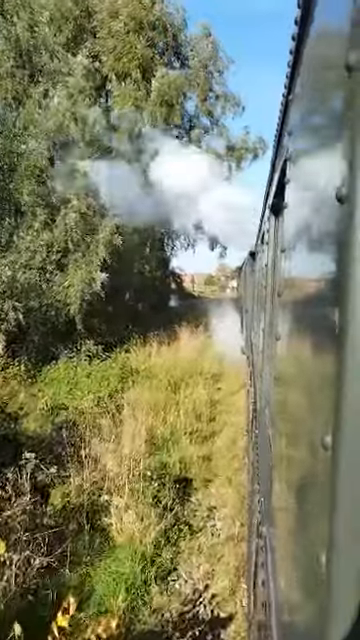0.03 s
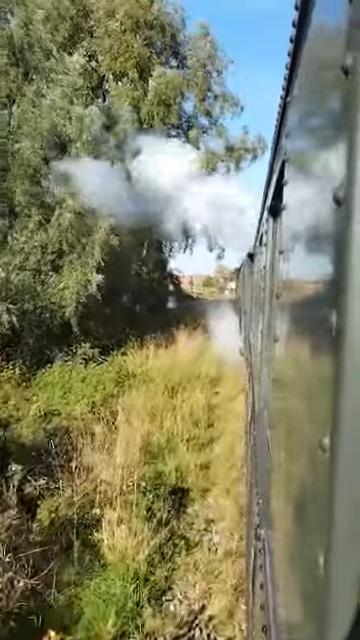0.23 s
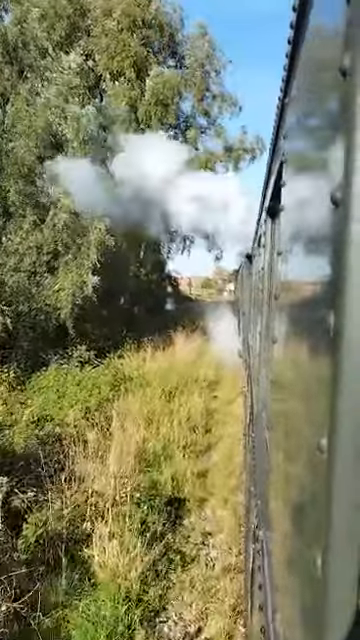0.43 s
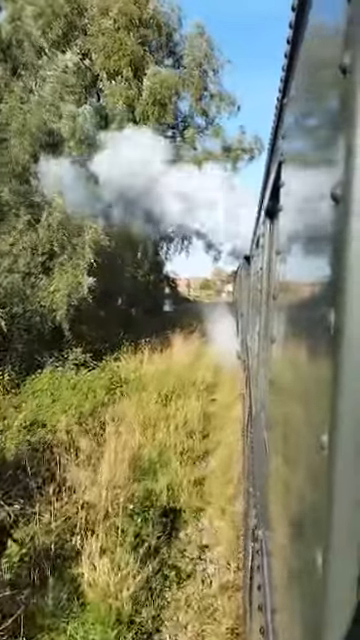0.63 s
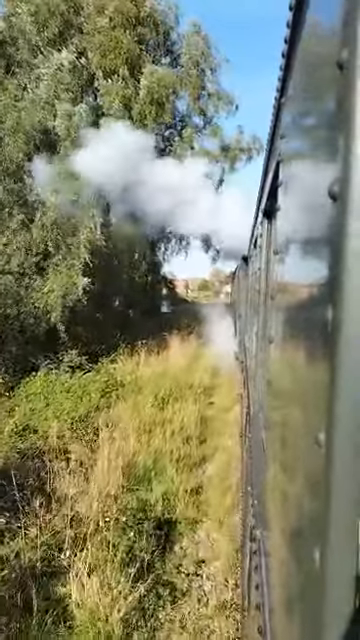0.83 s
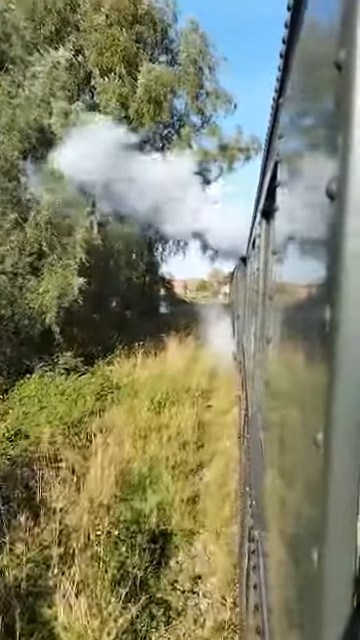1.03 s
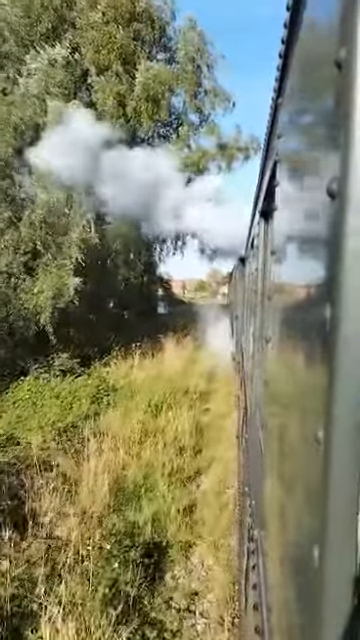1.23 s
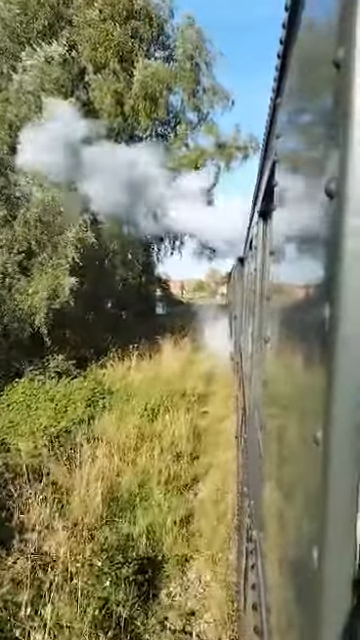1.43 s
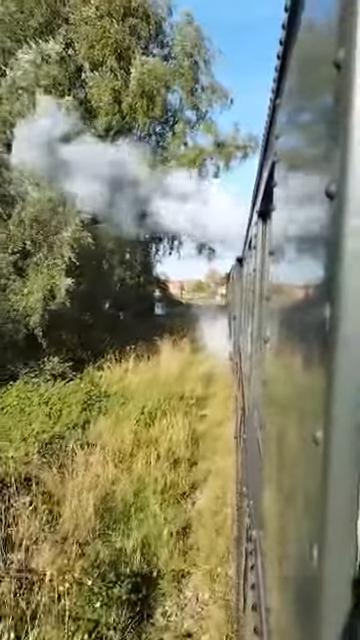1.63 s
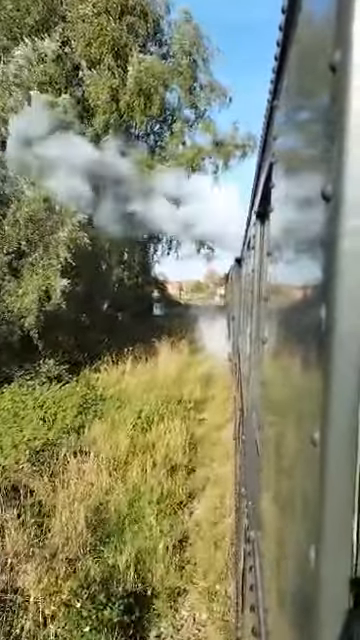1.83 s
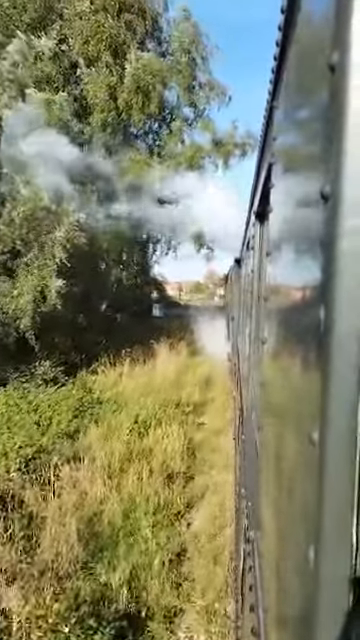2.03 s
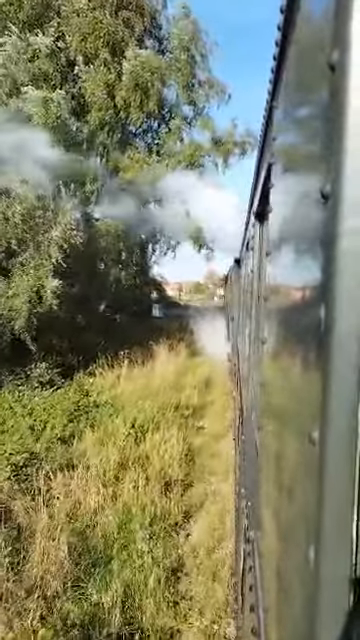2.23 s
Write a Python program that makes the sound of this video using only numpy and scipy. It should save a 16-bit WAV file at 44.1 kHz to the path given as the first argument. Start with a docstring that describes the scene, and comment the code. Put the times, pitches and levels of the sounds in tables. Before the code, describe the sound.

A steam locomotive whistle dominates: after brief running noise it scoops up at 0.2 seconds, holds a clear, fluttering note near 1170 hertz with short dips, climbs harsher around 1.1, then sags and shuts off at 1.33 with a steam puff and dull knock. Echoes scatter from trees and fade. Rumble, roar and wide airy hiss continue to 2.3, with wind buffeting around 0.45-0.75 and hollow booms near 2.0.

```python
"""Steam whistle from a carriage window

A locomotive's whistle scoops up to a steady note, is pulled higher and harsher, and sags as the valve shuts.
It is a sum of six fluttering sine partials plus steam noise; lineside trees scatter it back.
Underneath, the train rumbles, roars and hisses as shaped noise with sine booms and one knock.
Short bands of noise make a gust buffet the microphone. Only the hiss is stereo."""
import sys
import numpy as np
from scipy import signal
from scipy.fft import rfft, irfft, next_fast_len
from scipy.io import wavfile
from scipy.ndimage import uniform_filter1d, map_coordinates

SR = 44100
rng = np.random.default_rng(int(sys.argv[2]) if len(sys.argv) > 2 else 0)


def dump(signal):
    """Clip the signal to [-1, 1] and save it as 16-bit WAV at the path in sys.argv[1]."""
    limited = np.clip(np.atleast_2d(signal).T, -1, 1)
    pcm = np.round(limited * 32767).astype(np.int16)
    wavfile.write(sys.argv[1], SR, pcm)


N = 101429


def amp(db):
    """Decibels to gain."""
    return 10 ** (np.asarray(db) / 20)


def unit(x):
    """Scale to rms 1."""
    return x / np.sqrt(np.mean(x ** 2) + 1e-20)


def along(points, hz):
    """Interpolate (Hz, value) points on a log frequency axis."""
    f, v = np.transpose(points)
    return np.interp(np.log(hz + 1), np.log(f + 1), v)


def curve(rows, outside=None):
    """Interpolate (s, value) points to one value per sample."""
    s, v = np.transpose(rows)
    return np.interp(np.arange(N) / SR, s, v, outside, outside)


def wobble(rate):
    """Smooth random curve with rate knots per second."""
    knots = rng.standard_normal(4096)
    return map_coordinates(knots, [np.arange(N) * rate / SR], mode="wrap")


def bell(centre_s, width_s):
    """Gaussian envelope with peak 1; width is the standard deviation."""
    t = np.arange(N) / SR
    return np.exp(-.5 * ((t - centre_s) / width_s) ** 2)


def filtered(x, response):
    """Multiply the spectrum of x by a function of frequency."""
    m = next_fast_len(N + SR // 2)
    return irfft(rfft(x, m) * response(np.fft.rfftfreq(m, 1 / SR)), m)[..., :N]


def coloured(x, colour):
    """Filter x by a (Hz, dB) curve."""
    return filtered(x, lambda hz: amp(along(colour, hz)))


def noise(colour):
    """Coloured noise of rms 1."""
    return unit(coloured(rng.standard_normal(N), colour))


# Whistle pitch. Each row: time in seconds, pitch in Hz.
PITCH_HZ = [(.19, 900), (.22, 1050), (.25, 1125), (.3, 1160), (.45, 1168), (.72, 1170), (1.0, 1179),
            (1.05, 1199), (1.085, 1234), (1.12, 1332), (1.16, 1372), (1.22, 1370), (1.255, 1325),
            (1.285, 1279), (1.31, 1150), (1.33, 1060)]
# Fundamental level. Each row: time in seconds, level in dB.
FUNDAMENTAL_DB = [(.18, -50.5), (.215, -26.5), (.255, -16), (.3, -14), (.35, -18.5), (.4, -11), (.49, -9),
                  (.65, -5.5), (.78, -15.5), (.9, -8), (.99, -9), (1.045, -14), (1.125, -11), (1.185, -8.5),
                  (1.22, -27.5), (1.255, -8.5), (1.305, -11), (1.335, -33.5)]
# Second partial level. Each row: time in seconds, level in dB.
SECOND_DB = [(.22, -62), (.32, -36.5), (.41, -32), (.46, -34), (.52, -35), (.62, -55), (.67, -36),
             (.71, -35), (.8, -35.5), (.86, -36), (.94, -42), (.99, -30), (1.07, -46), (1.2, -34),
             (1.28, -33.5), (1.335, -60)]
# Third partial level, which the higher ones follow. Each row: time in seconds, level in dB.
THIRD_DB = [(.24, -53.5), (.36, -31), (.47, -49), (.52, -33.5), (.58, -44), (.71, -32.5), (.765, -42.5),
            (.8, -28), (.87, -48), (.95, -31), (1.02, -39), (1.08, -30), (1.16, -46.5), (1.21, -28),
            (1.27, -23.5), (1.315, -36.5)]
# Partials four to six over the third. Each row: level in dB at STEADY_HZ, level in dB at HARD_HZ.
OVERTONES_DB = [(-15.5, -7.5), (-18.5, -41), (-26, -32)]
# Steam jet noise, strongest as the valve shuts. Each row: time in seconds, level in dB.
STEAM_DB = [(.19, -73), (.3, -48), (1.1, -39), (1.2, -39.5), (1.28, -33.5), (1.335, -36.5), (1.4, -60),
            (1.45, -80)]
# Steam spectrum. Each row: frequency in Hz, relative level in dB.
STEAM_COLOUR = [(200, -41), (600, 1), (1000, -5.5), (1600, 1), (2200, -8), (4500, -4.5), (6500, -11.5),
                (9000, -22), (13000, -18.5)]
STEADY_HZ, HARD_HZ = 1159.7, 1410
JITTER_SHARE, JITTER_KNOTS_PER_S = 0.0021, 140
FADE_DB, FADE_KNOTS_PER_S = 1.56, 30  # overtone levels
ROUGH, ROUGH_KNOTS_PER_S = 0.28, 220  # overtone flutter: share of level, also radians of phase
BREATH_DB, BREATH_HALF_WIDTH_HZ = -29, 263.4  # turbulence around the note; dB over the fundamental
MERGE_HZ = 51  # closer to the steady note, reflections fade out instead of beating
NEAR_DB = -0.5


def whistle():
    """One pipe tone with fluttering pitch; on the glides it beats against its own near reflections."""
    pitch_hz = curve(PITCH_HZ)
    fluttering_hz = pitch_hz * (1 + JITTER_SHARE * wobble(JITTER_KNOTS_PER_S))
    phase = 2 * np.pi * np.cumsum(fluttering_hz) / SR
    hardness = np.clip((pitch_hz - STEADY_HZ) / (HARD_HZ - STEADY_HZ), 0, 1)

    breath_knots = 2 * BREATH_HALF_WIDTH_HZ
    breath = unit(wobble(breath_knots) * np.sin(phase) + wobble(breath_knots) * np.cos(phase))
    fundamental = unit(np.sin(phase)) + amp(BREATH_DB) * breath
    tone = amp(curve(FUNDAMENTAL_DB, -np.inf)) * fundamental

    third_db = curve(THIRD_DB, -np.inf)
    levels_db = [curve(SECOND_DB, -np.inf), third_db]
    for soft_db, hard_db in OVERTONES_DB:
        levels_db.append(third_db + soft_db + hardness * (hard_db - soft_db))
    for partial, db in enumerate(levels_db, start=2):
        flutter = 1 + ROUGH * wobble(ROUGH_KNOTS_PER_S)
        gain = amp(db + FADE_DB * wobble(FADE_KNOTS_PER_S))
        rough_phase = partial * phase + ROUGH * wobble(ROUGH_KNOTS_PER_S)
        tone += gain * unit(flutter * np.sin(rough_phase))

    gliding = np.clip(np.abs(pitch_hz - STEADY_HZ) / MERGE_HZ, 0, 1)
    reflected = amp(NEAR_DB) * near_reflections(tone * gliding)
    steam = amp(curve(STEAM_DB, -np.inf)) * noise(STEAM_COLOUR)
    return tone + reflected + steam


NEAR_T60_S, NEAR_GAP_S = 0.19, 0.0082


def near_reflections(x):
    """Carriage sides and bank: convolution with a short, dense, decaying noise cluster."""
    t = np.arange(SR // 4) / SR
    cluster = rng.standard_normal(len(t)) * amp(-60 * t / NEAR_T60_S) * (t > NEAR_GAP_S)
    return signal.fftconvolve(x, cluster / np.linalg.norm(cluster))[:N]


CHIFF_S, CHIFF_WIDTH_S, CHIFF_HZ, CHIFF_DB = 0.188, 0.017, 1336, -48.5


def chiff():
    """First steam over the lip: a brief faint sine squeak just before the pipe speaks."""
    t = np.arange(N) / SR
    return amp(CHIFF_DB) * bell(CHIFF_S, CHIFF_WIDTH_S) * unit(np.sin(2 * np.pi * CHIFF_HZ * t))


# Tree scatter decay. Each row: frequency in Hz, t60 in seconds.
TREES_T60_S = [(1200, 2.17), (2600, 1.2), (4000, .95), (5500, .7), (10000, .4)]
# Tree scatter spectrum. Each row: frequency in Hz, gain in dB.
TREES_COLOUR = [(1200, -9), (2350, -8), (2700, -3), (3500, -3), (4000, 0), (5400, -5.5), (9000, -8)]
# Distinct lineside echoes. Each row: delay in seconds, level in dB before the echo spectrum.
ECHOES = [(.11, -24), (0.184, -19), (.24, -27), (.5, -20)]
# Echo spectrum. Each row: frequency in Hz, gain in dB.
ECHO_COLOUR = [(1400, -1), (2600, 7.5), (4000, 12.5), (5500, 7), (8000, -15)]
ECHO_DULL_DB_PER_S_KHZ = 15  # treble loss above HARD_HZ, growing with delay
ECHO_LATE_S, SCATTER_TURN_HZ = 0.00102, 1.579


def trees(x):
    """Diffuse scatter, ever changing as the train moves between two noise tails, plus distinct echoes."""
    hz, t, z = signal.stft(rng.standard_normal((2, 2 * SR)), SR, nperseg=256)
    t60 = along(TREES_T60_S, hz)[:, None]
    unit_energy = np.sqrt(2 * np.log(1000) / (t60 * SR))
    tails = signal.istft(z * amp(-60 * t / t60) * unit_energy, SR, nperseg=256)[1]
    a, b = signal.fftconvolve(x[None], tails, axes=1)[:, :N]
    turn = 2 * np.pi * SCATTER_TURN_HZ * np.arange(N) / SR
    scatter = coloured(a * np.cos(turn) + b * np.sin(turn), TREES_COLOUR)

    echoes = np.zeros(N)
    for delay_s, db in ECHOES:
        delay = int(SR * (delay_s + abs(rng.normal(0, ECHO_LATE_S))))
        late = np.pad(x, (delay, 0))[:N]
        dull_db_per_khz = ECHO_DULL_DB_PER_S_KHZ * delay_s
        echoes += filtered(late, lambda f: amp(db - dull_db_per_khz * np.maximum(f - HARD_HZ, 0) / 1000))
    return scatter + coloured(echoes, ECHO_COLOUR)


# Dips of the note. Each row: centre in seconds, half width in seconds, depth in dB.
FADES = [(0.54, 0.015, -12.5), (0.719, 0.015, -8), (0.944, 0.016, -12.5)]
# Band that dips. Each row: frequency in Hz, share that fades from 0 to 1.
FADE_BAND = [(950, 0), (1100, 1), (1250, 1), (1500, 0)]


def fading(x):
    """The held note dips briefly where its paths cancel as the train moves: Gaussian dips in one band."""
    db = sum(depth_db * bell(s, width_s) for s, width_s, depth_db in FADES)
    return x + (amp(db) - 1) * filtered(x, lambda hz: along(FADE_BAND, hz))


# Bass of the running noise. Each row: time in seconds, level in dB.
RUMBLE_DB = [(0, -47), (.08, -33), (.18, -41), (.26, -36), (.45, -36), (.7, -35), (.87, -42), (1.1, -38.5),
             (1.4, -39), (1.6, -38.5), (1.9, -44), (2.02, -34), (2.3, -42)]
# Rumble spectrum. Each row: frequency in Hz, relative level in dB.
RUMBLE_COLOUR = [(15, -20), (30, -16.5), (44, 0.5), (58, -5), (100, -11), (160, -18.5), (400, -73)]
# Low middle of the running noise. Each row: time in seconds, level in dB before flutter.
ROAR_DB = [(0, -45.5), (.05, -48.5), (.11, -35.5), (.22, -42), (.37, -43), (.75, -39), (.95, -49.5),
           (1.06, -40), (1.18, -46), (1.29, -44.5), (1.44, -48), (1.56, -36.5), (1.7, -46.5), (1.9, -46),
           (2.02, -36.5), (2.3, -46.5)]
# Roar spectrum. Each row: frequency in Hz, relative level in dB.
ROAR_COLOUR = [(60, -20), (130, 1), (240, 2.5), (340, -4), (560, -5.5), (800, -11.5), (1500, -17),
               (2500, -20.5), (6000, -44.5)]
# Running gear booms and moans. Each row: centre in seconds, half length in seconds,
# pitch in Hz before wander, peak level in dB.
BOOMS = [(0.382, 0.016, 236.7, -34), (0.418, 0.044, 880, -41.5), (1.072, 0.026, 239.5, -37.5),
         (1.562, 0.055, 593, -44), (1.964, 0.075, 547.7, -45.5), (2, 0.016, 233.7, -28),
         (2.05, 0.041, 238.6, -39), (2.121, 0.019, 192.5, -31), (2.242, 0.055, 177.7, -43)]
ROAR_FLUTTER_DB, ROAR_KNOTS_PER_S = 1.3, 25.48
BOOM_WANDER_HZ, BOOM_KNOTS_PER_S = 15, 90
KNOCK_S, KNOCK_WIDTH_S, KNOCK_HZ, KNOCK_DB = 1.334, 0.0054, 87, -23.5


def train():
    """Noise rumble and roar, hollow booms as wandering sines, one dull carriage knock as a sine burst."""
    t = np.arange(N) / SR
    out = amp(curve(RUMBLE_DB)) * noise(RUMBLE_COLOUR)
    roar_db = curve(ROAR_DB) + ROAR_FLUTTER_DB * wobble(ROAR_KNOTS_PER_S)
    out += amp(roar_db) * noise(ROAR_COLOUR)
    for s, width_s, hz, db in BOOMS:
        phase = 2 * np.pi * np.cumsum(hz + BOOM_WANDER_HZ * wobble(BOOM_KNOTS_PER_S)) / SR
        out += amp(db) * bell(s, width_s) * unit(np.sin(phase))
    knock = unit(np.sin(2 * np.pi * KNOCK_HZ * (t - KNOCK_S)))
    return out + amp(KNOCK_DB) * bell(KNOCK_S, KNOCK_WIDTH_S) * knock


# Microphone gusts. Each row: start in seconds, length before release in seconds, level in dB, centre in Hz.
GUSTS = [(0.446, 0.02, -31, 930), (.443, 0.029, -28, 360), (.5, 0.13, -31, 264), (.499, 0.032, -30, 1280),
         (.56, 0.026, -31, 1330), (.612, .02, -32, 2100), (.5, 0.14, -25.5, 47), (0.549, 0.038, -24, 51),
         (.498, 0.086, -28.5, 114), (0.68, 0.056, -28.5, 39)]
GUST_ATTACK_S, GUST_RELEASE_S, GUST_Q = .003, 0.015, 1.78
GUST_LUMP_DB, GUST_KNOTS_PER_S, GUST_TOP_HZ = 1.5, 69.53, 3500


def wind():
    """Short lumpy gusts on the microphone: resonant bands of noise, softened in the treble."""
    t, out = np.arange(N) / SR, np.zeros(N)
    for s, length_s, db, hz in GUSTS:
        attack = np.clip((t - s) / GUST_ATTACK_S, 0, 1)
        release = np.exp(-np.maximum(t - s - length_s, 0) / GUST_RELEASE_S)

        def response(f):
            """Band-pass at hz times a gentle low-pass."""
            band = 1j * f * hz / (hz * hz - f * f + 1j * f * hz / GUST_Q)
            return band / (1 + (f / GUST_TOP_HZ) ** 2)

        puff = filtered(rng.standard_normal(N), response)
        lumps = amp(GUST_LUMP_DB * wobble(GUST_KNOTS_PER_S))
        out += amp(db) * attack * release * unit(puff * lumps)
    return out


# Hiss level. Each row: time in seconds, mid level in dB before flutter.
HISS_DB = [(0, -38), (.04, -38), (.12, -44), (.15, -41.5), (.18, -38.5), (.27, -34.5), (.45, -36.5),
           (.72, -36), (.85, -35.5), (1.1, -40.5), (1.2, -34.5), (1.28, -34), (1.38, -36), (1.55, -34.5),
           (1.93, -36.5), (1.98, -35), (2.045, -44.5), (2.1, -36), (2.3, -36)]
# Hiss spectrum. Each row: frequency in Hz, relative level in dB.
HISS_COLOUR = [(200, -25), (900, -2), (2000, -1.5), (4000, 1), (5500, 2.5), (7000, -1.5), (10000, 1),
               (13000, -1)]
# Stereo width. Each row: frequency in Hz, side over mid in dB.
HISS_WIDTH = [(3300, -90), (3900, -29), (4800, -8.5), (7000, -3), (10000, -4), (13000, -9)]
HISS_FLUTTER_DB, HISS_KNOTS_PER_S, HISS_PATCHY_DB = .55, 40.1, 1.3


def hiss():
    """Rushing noise that dips about once a second; only its treble is wide."""
    mid = patchy(noise(HISS_COLOUR), HISS_PATCHY_DB)
    side = coloured(patchy(noise(HISS_COLOUR), HISS_PATCHY_DB), HISS_WIDTH)
    level_db = curve(HISS_DB) + HISS_FLUTTER_DB * wobble(HISS_KNOTS_PER_S)
    return amp(level_db) * np.array([mid + side, mid - side])


def patchy(x, depth_db):
    """Noise whose bands swell and sink independently, by a smoothed random time-frequency gain."""
    z = signal.stft(x, nperseg=512)[2]
    field = uniform_filter1d(rng.standard_normal(z.shape), size=12, axis=0)
    field = uniform_filter1d(field, size=8, axis=1)
    return unit(signal.istft(z * amp(depth_db * unit(field)), nperseg=512)[1][:N])


def scene():
    """Whistle and its surroundings, train and wind in the centre, hiss in stereo."""
    call = chiff() + whistle()
    return fading(call + trees(call)) + train() + wind() + hiss()


CLIP_DB, TOP_HZ = 2, 13100


def record(dry):
    """Round off peaks towards CLIP_DB, then remove everything from TOP_HZ up."""
    rounded = dry / (1 + np.abs(dry / amp(CLIP_DB)) ** 10) ** (1 / 10)
    return filtered(rounded, lambda hz: hz < TOP_HZ)


dry = scene()
out = record(dry)
dump(out)
```